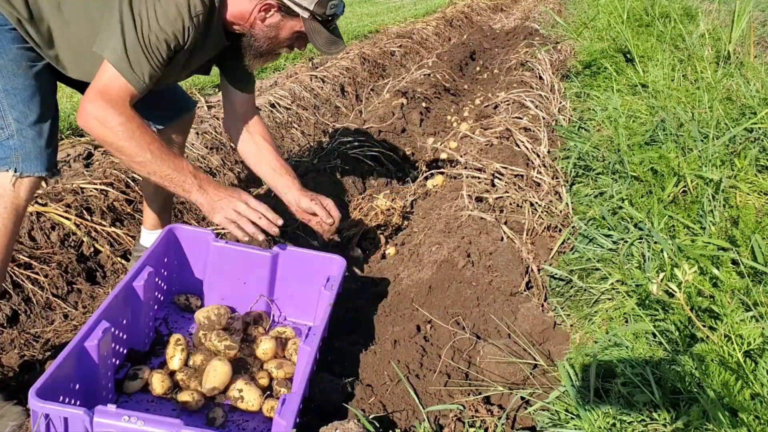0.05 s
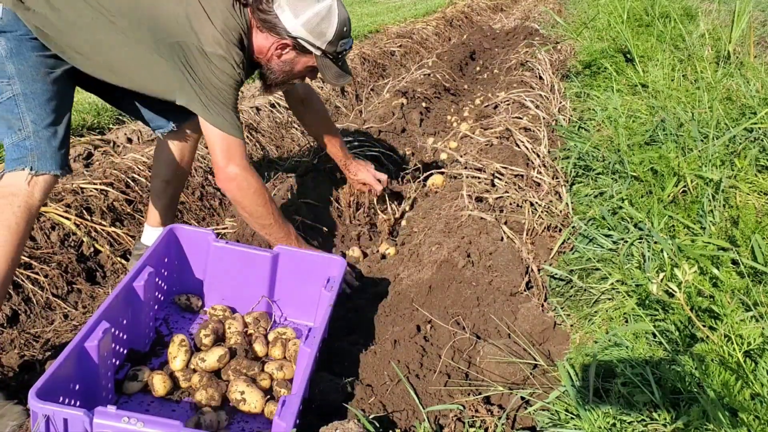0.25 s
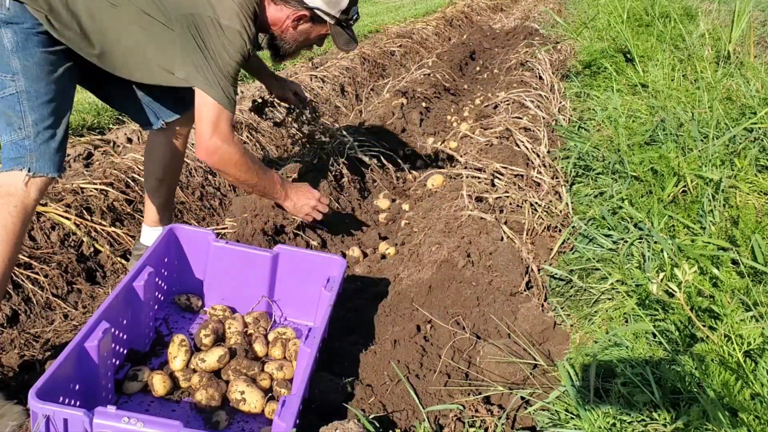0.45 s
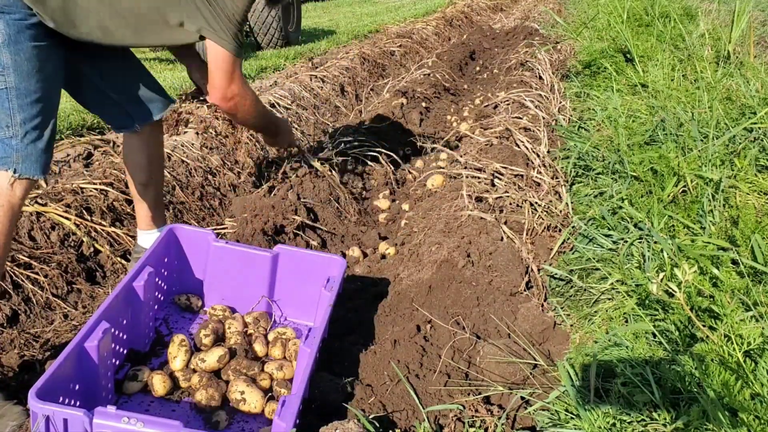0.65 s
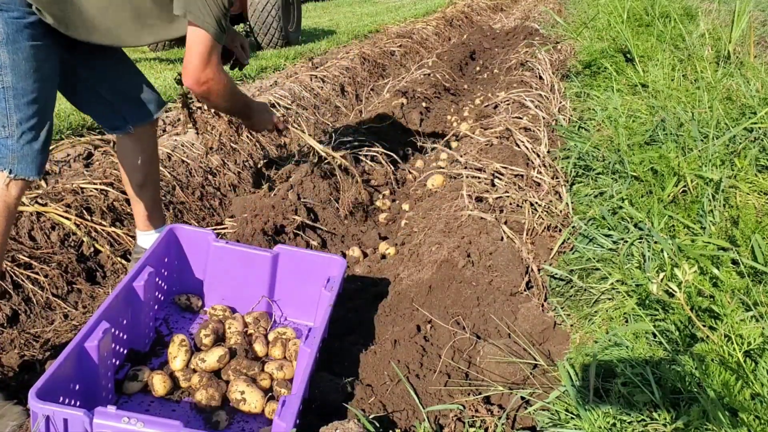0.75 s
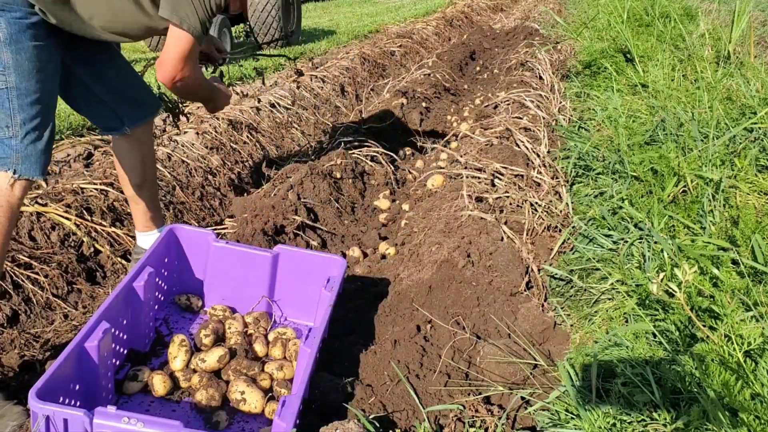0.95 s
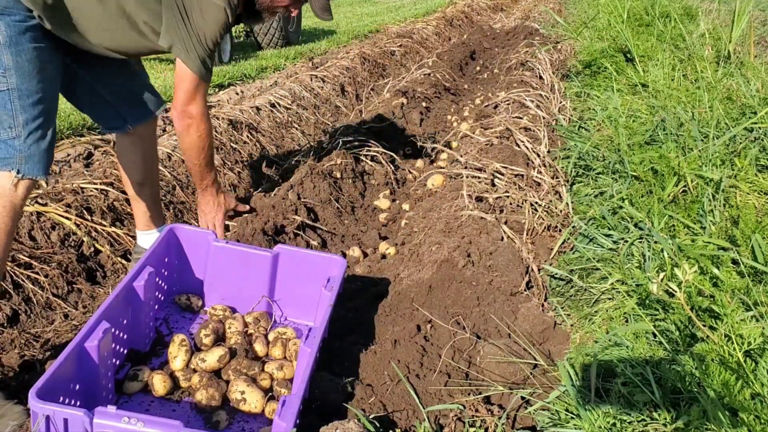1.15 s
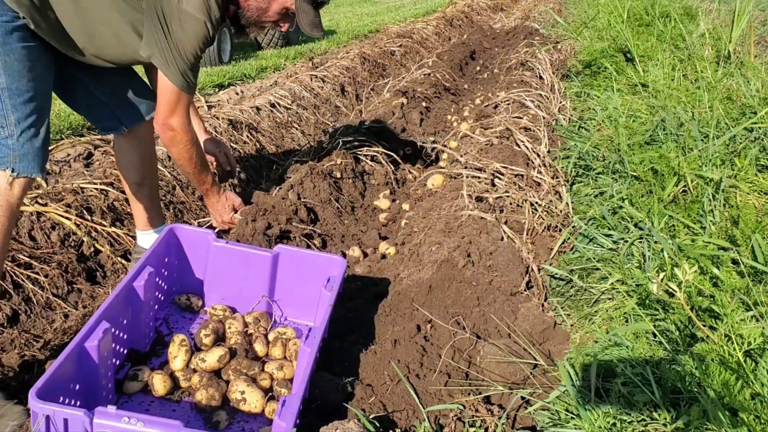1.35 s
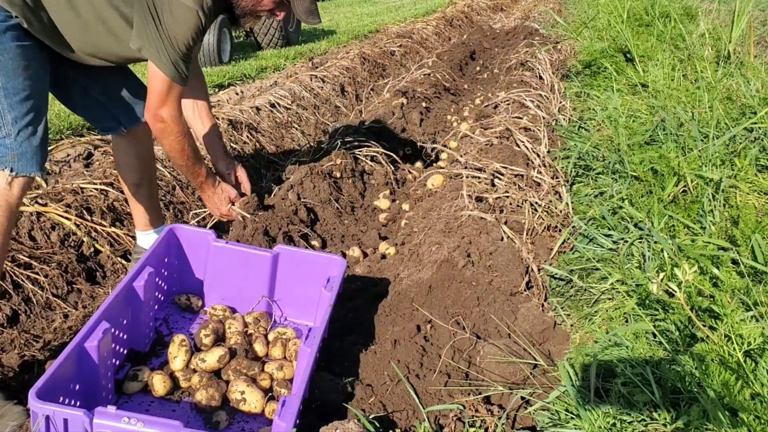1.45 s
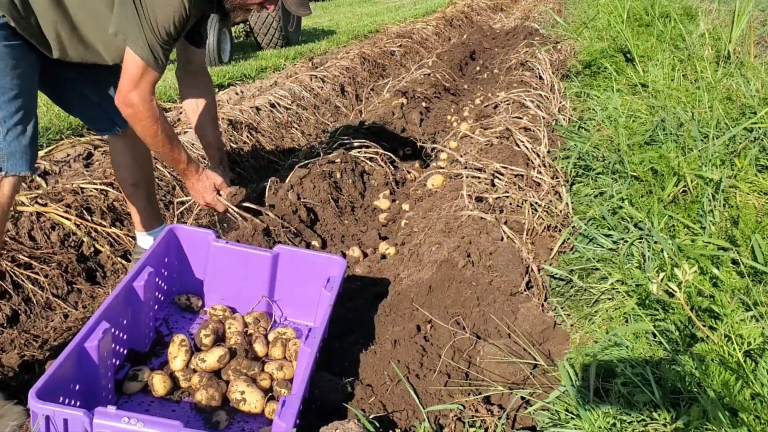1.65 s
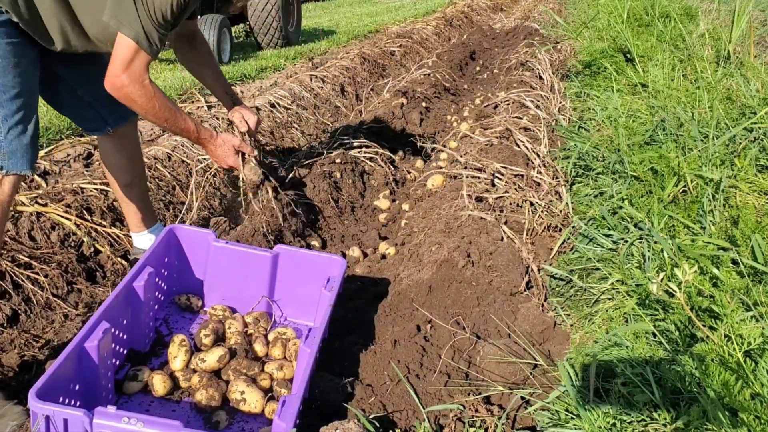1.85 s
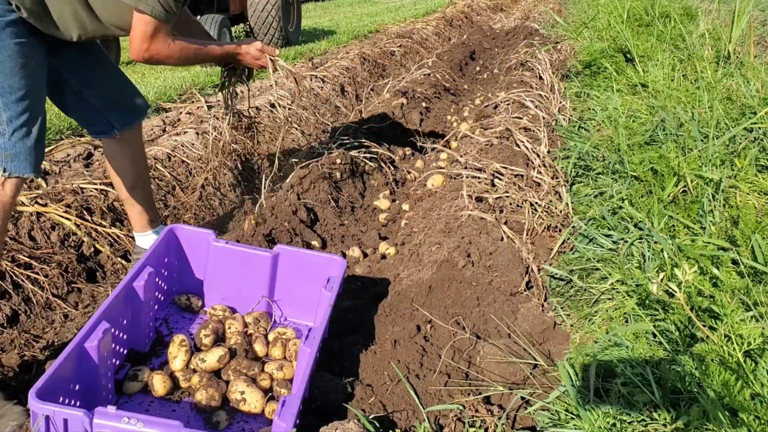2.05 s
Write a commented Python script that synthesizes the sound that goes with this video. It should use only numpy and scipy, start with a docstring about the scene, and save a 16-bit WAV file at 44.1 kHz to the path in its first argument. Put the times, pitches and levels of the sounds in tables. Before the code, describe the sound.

Close to the microphone, potatoes tumble into a plastic crate, thump once loudly and settle on the heap. Faint trickling soil and a small crackle of dry stems follow, in an open field with soft insects and a far engine hum.

```python
"""A far engine hums and a katydid ticks; almost at once, potatoes tumble into a plastic crate.
They rub together and make the plastic ring: one hits the floor hard, the rest settle on the heap.
Loose soil patters after them, then dry vines are pulled from the row, rustle and snap.
The katydid keeps ticking by rubbing its wings. Behind it are a chirping cricket, one early bird
call, a thin insect buzz and the hiss of open air."""
import sys
import numpy as np
from scipy import signal
from scipy.fft import rfft, irfft, next_fast_len
from scipy.io import wavfile
from scipy.ndimage import map_coordinates

SR = 44100
rng = np.random.default_rng(int(sys.argv[2]) if len(sys.argv) > 2 else 0)


def transcribe(signal):
    """Save signal, clipped to [-1, 1], as a 16-bit WAV file at the path in sys.argv[1]."""
    frames = np.atleast_2d(signal).T
    limited = np.clip(frames, -1, 1)
    pcm = np.round(limited * 32767).astype(np.int16)
    wavfile.write(sys.argv[1], SR, pcm)


N = 92610

# the tones the crate rings with: f/Hz, level/dB, t60/s (the time to fade by 60 dB)
CRATE_TONES = [(90, -14, 0.081), (194, -23.5, 0.26), (276.1, -3, 0.12), (405, 0, 0.03), (470, -5, 0.037),
               (654.5, -18.5, 0.061), (703, -17, .09), (990, -21.5, 0.063), (1223, -36, .1),
               (1362, -40, 0.1), (1600, -26, .04), (1876, -31.5, 0.056), (2330, -28, 0.043),
               (2590, -20, 0.018)]
# potatoes hitting the crate or the heap: t/s, level/dB, treble cutoff f/Hz, struck spot's f/Hz
KNOCKS = [(.168, -36.5, 890, 440), (0.184, -31.5, 1100, 763), (.229, -33, 900, 287),
          (0.243, -38, 1415, 700), (.2912, -5.5, 3500, 409), (0.2966, -23, 2500, 510),
          (0.3211, -31.5, 4000, 1143), (0.342, -19.5, 1500, 300), (0.392, -36.5, 880, 448),
          (0.414, -27, 1000, 354), (.480, -35, 1400, 288), (0.517, -50.5, 1000, 840), (.547, -35, 700, 269),
          (0.57, -48, 1000, 827), (.672, -37.5, 202, 260)]
# tone colour of the crack in each knock: f/Hz, level/dB
CRACK_COLOUR = [(150, -17), (450, -2.5), (1000, -7.5), (2500, -11.5), (3500, -19), (5200, -16),
                (7000, -35.5), (15000, -37)]
# potatoes rubbing over each other: t/s, length/s, level/dB
RUBS = [(0.157, 0.041, -39.5), (0.214, 0.052, -36.5), (0.267, 0.053, -41), (.312, 0.022, -29),
        (0.33, .04, -44), (0.373, 0.077, -57), (0.464, 0.036, -46.5), (.56, 0.032, -57.5)]
# tone colour of the rubbing, ringing through the hollow plastic crate: f/Hz, level/dB
RUB_COLOUR = [(100, -22), (200, 6.5), (275, 1.5), (330, -1), (470, 5), (570, -10.5), (760, -1.5),
              (920, -17), (1060, -8.5), (1250, -18.5), (1380, -18), (1850, -32.5), (2080, -25),
              (2400, -31.5), (3400, -33), (5000, -44.5), (12000, -52)]
# the crate rocking on the ground: t/s, length/s, level/dB
THUDS = [(0.139, 0.15, -36), (0.278, 0.33, -40)]
# tone colour of the rocking: f/Hz, level/dB
THUD_COLOUR = [(20, -25), (45, -6), (85, 8), (180, -9), (300, -14), (600, -64)]
# tone colour of soil landing on plastic: f/Hz, level/dB
SOIL_COLOUR = [(1500, -19), (3800, -8), (5200, 5.5), (7000, -6), (8600, 5), (10700, -9.5), (12500, 2.5),
               (15800, -3)]
# crumbs falling from lifted roots: t/s, length/s, level/dB
TRICKLES = [(0.47, 0.17, -63), (0.656, 0.32, -69.5), (0.752, 0.13, -92), (0.965, 0.13, -72),
            (1.759, 0.16, -72), (1.873, 0.32, -69.5)]
# tone colour of those crumbs: f/Hz, level/dB
TRICKLE_COLOUR = [(1500, -19.5), (3800, -15), (5000, -3.5), (5900, 2.5), (7500, -10), (9000, -2.5),
                  (11000, -10), (15000, -11.5)]
# dry vines dragged over soil: t/s, length/s, level/dB, centre f/Hz
RUSTLES = [(1.373, 0.075, -57, 7550), (.765, 0.034, -69, 2600)]
# stems snapping and crumbs ticking, one row per pitch: t/s, level/dB, f/Hz, t60/s
SNAPS = [(0.237, -67.5, 8000, .03), (.781, -61, 7500, 0.033), (1.332, -66, 8000, 0.021),
         (1.9155, -43.5, 5150, 0.019), (1.917, -51.5, 2950, 0.036), (1.9272, -39.5, 6300, 0.012),
         (1.9257, -39.5, 9560, 0.017), (1.9269, -46.5, 11830, 0.015), (1.936, -48.5, 5380, 0.022),
         (1.944, -55, 7000, 0.033), (1.916, -66.5, 1046, .04)]
# katydid ticks: t/s, level/dB
KATYDID_TICKS = [(.015, -62), (0.112, -61.5), (0.218, -58), (.325, -52.5), (.442, -57), (0.574, -58.5),
                 (0.664, -57.5), (0.761, -58), (0.848, -58.5), (0.945, -63.5), (1.031, -62.5), (1.123, -60),
                 (1.212, -60.5), (1.316, -60.5), (1.413, -60), (1.504, -59), (1.597, -62), (1.689, -59),
                 (1.796, -59), (1.884, -60), (1.976, -57), (2.076, -55.5)]
# cricket chirps: t/s, length/s, level/dB
CRICKET_CHIRPS = [(-.04, 0.05, -65), (0.058, 0.058, -73.5), (0.19, 0.093, -71), (0.669, 0.064, -73),
                  (0.802, 0.053, -69), (1.02, 0.041, -71), (1.285, 0.056, -75), (1.426, 0.095, -74.5),
                  (1.644, 0.087, -76), (1.743, 0.081, -74.5), (1.938, 0.091, -71.5)]
# the engine's tones: f/Hz, level/dB
ENGINE_TONES = [(79.3, -3), (121.5, -8), (190.5, -17.5)]
# tone colour of its rumble: f/Hz, level/dB
RUMBLE_COLOUR = [(15, -23), (35, -6.5), (60, -3.5), (85, 1.5), (115, -3.5), (150, -13), (200, -14),
                 (260, -25.5), (400, -39.5), (700, -75.5), (2000, -100)]
# how the whole engine grows louder and softer: t/s, level/dB
ENGINE_LEVEL = [(0, -45.5), (.6, -44.5), (.9, -45.5), (1.0, -51.5), (1.2, -48), (1.45, -51), (1.65, -46.5),
                (2.1, -42)]
# tone colour of open air: f/Hz, level/dB
AIR_COLOUR = [(100, 3), (400, -2), (700, 1), (1000, -1), (1500, -6), (2500, -12.5), (4000, -11),
              (7000, -10), (10000, -6), (13000, -8.5), (15500, -2.5)]
# the microphones' boost or cut of the left-right difference: f/Hz, level/dB
STEREO_WIDTH = [(30, -26.5), (100, -31), (150, -10.5), (300, 4), (2000, 6.5), (4800, 9.5), (6500, -8),
                (15000, -5.5)]

SIDE_DB, TREBLE_SIDE_DB, BASS_SIDE_DB = -26.5, -13, -21.5  # stereo spread: lower is narrower


def knocks(contact_s=0.0013, heap_damping=0.51, scatter_db=3):
    """Each potato makes the crate ring and crack; the heap cuts the ring of softer knocks short."""
    out = np.zeros((2, N))
    hardest_db = max(row[1] for row in KNOCKS)
    t = np.arange(SR // 3) / SR
    rise = 1 - np.exp(-t / contact_s)
    hz, level, t60 = np.transpose(CRATE_TONES)[:, :, None]
    signs = (-1) ** (np.arange(len(CRATE_TONES)) // 3)  # tones start up or down, in groups of three
    for start, db, cutoff_hz, spot_hz in KNOCKS:
        soft = db < hardest_db
        ring_s = t60 * (heap_damping if soft else 1)
        tones = amp(level) * np.sin(2 * np.pi * hz * t) * np.exp(-np.log(1000) * t / ring_s) * rise
        chance = rng.standard_normal((2, len(CRATE_TONES)))
        centre = (amp(scatter_db * soft * chance[0]) * signs) @ tones
        side = np.imag(signal.hilbert(np.sign(chance[1]) @ tones)) * rise  # a quarter cycle behind
        ring = np.pad(stereo([centre, side], SIDE_DB), ((0, 0), (round(start * SR), N)))[:, :N]
        crack = amp(-18.5) * strike(start, t60=0.041, rise=contact_s)
        crack = crack * noise(colour(CRACK_COLOUR), SIDE_DB)
        spot = amp(5.5) * strike(start, t60=0.044, rise=0.0063)  # a soft knock also rings where it lands
        spot = spot * np.sin(2 * np.pi * spot_hz * (clock() - start))
        cut_treble = lambda f: 1 / (1 + np.sqrt(2) * 1j * f / cutoff_hz - (f / cutoff_hz) ** 2)
        out += amp(db) * filtered(ring - soft * spot + crack, cut_treble)
    return out


def rubbing():
    """Gritty skins scrape over each other in the hollow crate; each rub leaves a short fading tail."""
    loudness = np.zeros(N)
    for start, length, db in RUBS:
        tail = amp(db - 7.5) * strike(start + length / 2, t60=0.19, rise=0.0058)
        loudness += swell(start, length, db) + tail
    return loudness * grains(colour(RUB_COLOUR), SIDE_DB)


def rocking():
    """The crate rocks on the ground with low thuds."""
    return swells(THUDS) * noise(colour(THUD_COLOUR), BASS_SIDE_DB)


def soil(start_s=0.283, rise_s=0.01, fade_db_per_s=81.5):
    """Crumbs shaken loose by the hard knock patter on the plastic; more trickle from the roots."""
    t = np.maximum(clock() - start_s, 0)
    loudness = np.minimum(t / rise_s, 1) * amp(-50 - fade_db_per_s * t)
    patter = loudness * grains(colour(SOIL_COLOUR), TREBLE_SIDE_DB)
    trickle = swells(TRICKLES) * grains(colour(TRICKLE_COLOUR), TREBLE_SIDE_DB)
    return patter + trickle


def vine_rustles(width_octaves=0.28):
    """Dry vines drag over the soil, making many tiny clicks that blur together."""
    out = np.zeros((2, N))
    for start, length, db, centre_hz in RUSTLES:
        peak = lambda hz: np.exp(-0.5 * (np.log2((hz + 1) / centre_hz) / width_octaves) ** 2)
        straw = lambda hz: peak(hz) + amp(-10) * hz / (hz + centre_hz)  # plus some broad hiss
        out += amp(db) * swell(start, length, 0) ** 2 * grains(straw, TREBLE_SIDE_DB)
    return out


def stem_snaps(sharpness=4.5):
    """A breaking stem gives a short ping and a splintering noise around the same pitch."""
    out = np.zeros((2, N))
    for start, db, pitch_hz, t60 in SNAPS:
        stem = lambda hz: 1 / (1 + 1j * sharpness * (hz / pitch_hz - pitch_hz / (hz + 1)))
        ping = amp(-0.5) * np.sin(2 * np.pi * pitch_hz * clock() + wobble(300))
        splinters = amp(-4) * noise(stem, SIDE_DB)
        out += amp(db) * strike(start, t60, rise=0.00025) * (ping + splinters)
    return out


def katydid(pitch_hz=10077, sag_hz=260, strokes_per_s=190, tick_s=0.033):
    """Each tick is a swelling run of wing strokes, and each stroke sags in pitch."""
    t = clock()
    ticks = sum(amp(db) * np.interp((t - start) / tick_s, [0, 0.66, 1], [0, 1, 0]) ** 0.807
                for start, db in KATYDID_TICKS)
    stroke = (strokes_per_s * t + 0.3 * wobble(86)) % 1  # runs from 0 to 1 in each stroke
    hz = pitch_hz + sag_hz * (0.5 - stroke) + 50 * wobble(220)
    loudness = amp(3 * wobble(strokes_per_s)) * np.sin(np.pi * stroke)
    roughness = 0.35 * wobble(1800)
    tone = np.sin(2 * np.pi * np.cumsum(hz) / SR + roughness)
    return amp(1) * ticks * unit(loudness * tone)


def cricket():
    """A far cricket chirps on one high, fluttering note."""
    flutter = amp(2 * wobble(90))
    return swells(CRICKET_CHIRPS) * flutter * noise(band(centre_hz=5610, width_hz=170), TREBLE_SIDE_DB)


def bird():
    """A far bird gives one short, breathy call."""
    call = swell(start=0.033, length=0.067, db=-72)
    return call * noise(band(centre_hz=3130, width_hz=160), TREBLE_SIDE_DB)


def insect_buzz(pulses_per_s=95):
    """An insect buzzes thinly: a very high hiss in quick pulses."""
    pulses = np.sin(np.pi * pulses_per_s * clock() + wobble(22)) ** 2
    hiss = noise(band(centre_hz=14900, width_hz=1200), TREBLE_SIDE_DB)
    return amp(-82.5) * unit(pulses * hiss)


def engine():
    """A far engine hums with a few wavering tones in a low rumble."""
    t = clock()
    tones = np.zeros(N)
    for hz, db in ENGINE_TONES:
        loudness = amp(db + 0.9 * wobble(13)) * np.sqrt(2)
        tones += loudness * np.sin(2 * np.pi * hz * t + 0.95 * wobble(5.37))
    rumble = amp(-1) * noise(colour(RUMBLE_COLOUR), BASS_SIDE_DB)
    return amp(np.interp(t, *np.transpose(ENGINE_LEVEL))) * (tones + rumble)


def air():
    """Open air hisses faintly all round, its level drifting a little."""
    return amp(-73.5 + wobble(6)) * noise(colour(AIR_COLOUR), side_db=-5)


def amp(db):
    """Turn decibels into a number to multiply by."""
    return 10 ** (np.asarray(db) / 20)


def unit(x):
    """Scale a sound to an average strength (rms) of 1."""
    return x / np.sqrt(np.mean(x ** 2) + 1e-20)


def clock():
    """The time of every sample, in seconds."""
    return np.arange(N) / SR


def colour(points):
    """A filter curve that joins points of f/Hz, level/dB."""
    f, db = np.transpose(points)
    return lambda hz: amp(np.interp(np.log(hz + 1), np.log(f + 1), db))


def band(centre_hz, width_hz):
    """A filter curve that keeps only what lies near one pitch."""
    return lambda hz: 1 / (1 + ((hz - centre_hz) / width_hz) ** 4)


def filtered(x, curve):
    """Turn each frequency of a sound up or down as the curve says."""
    size = next_fast_len(N + SR // 2)
    return irfft(rfft(x, size) * curve(np.fft.rfftfreq(size, 1 / SR)), size)[..., :N]


def wobble(rate):
    """A smooth curve through `rate` random values a second."""
    return map_coordinates(rng.standard_normal(N // 8), [clock() * rate + 2])


def stereo(pair, side_db):
    """Make left and right from a centre signal and a weaker side signal."""
    side = amp(side_db) * pair[1]
    return np.array([pair[0] + side, pair[0] - side])


def noise(curve, side_db):
    """Filtered stereo noise of strength 1."""
    return unit(stereo(filtered(rng.standard_normal((2, N)), curve), side_db))


def grains(curve, side_db, per_s=14000, spread_db=1.5):
    """A dense spray of tiny, uneven clicks, of strength 1."""
    sizes = amp(spread_db * np.minimum(rng.exponential(size=N), 4))
    hits = rng.random(N) < per_s / SR
    clicks = sizes * hits * rng.standard_normal((2, N))
    return unit(stereo(filtered(clicks, curve), side_db))


def swell(start, length, db):
    """One smooth rise and fall."""
    return amp(db) * np.sin(np.pi * np.clip((clock() - start) / length, 0, 1))


def swells(table):
    """One swell for each row of a table."""
    return sum(swell(*row) for row in table)


def strike(start, t60, rise):
    """A quick rise, then a fade of 60 dB every t60 seconds."""
    t = np.maximum(clock() - start, 0)
    return (1 - np.exp(-t / rise)) * np.exp(-np.log(1000) * t / t60)


def scene():
    """The crate close by, the row of vines behind it, the field all round."""
    harvest = knocks() + rubbing() + rocking() + soil() + vine_rustles() + stem_snaps()
    return harvest + katydid() + cricket() + bird() + insect_buzz() + air() + engine()


def record(dry, top_hz=15850):
    """The close microphones narrow the bass and high treble, widen the rest and stop at top_hz."""
    side = filtered((dry[0] - dry[1]) / 2, colour(STEREO_WIDTH))
    return filtered(dry.mean(axis=0) + np.array([side, -side]), lambda hz: hz < top_hz)


dry = scene()
out = record(dry)
transcribe(out)
```